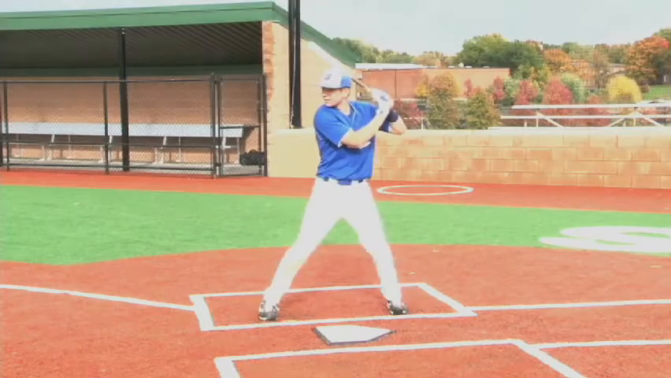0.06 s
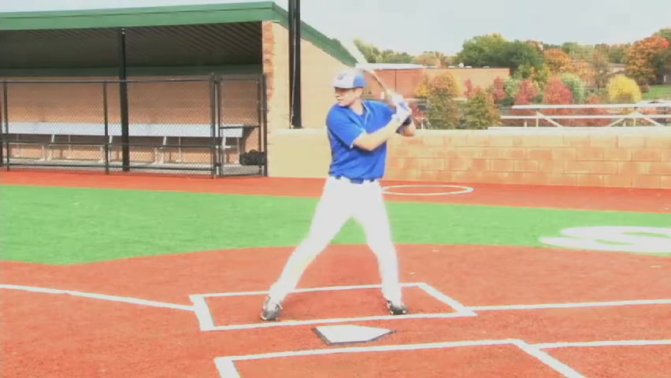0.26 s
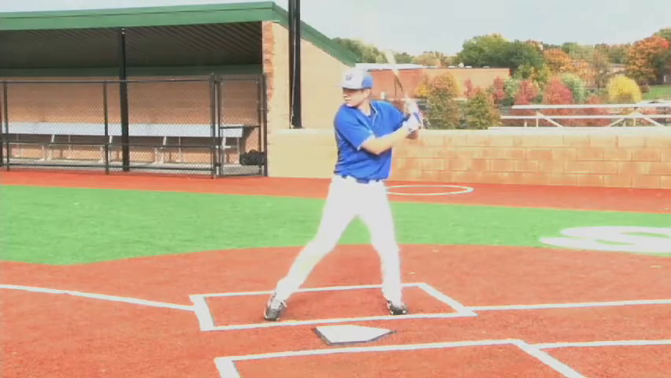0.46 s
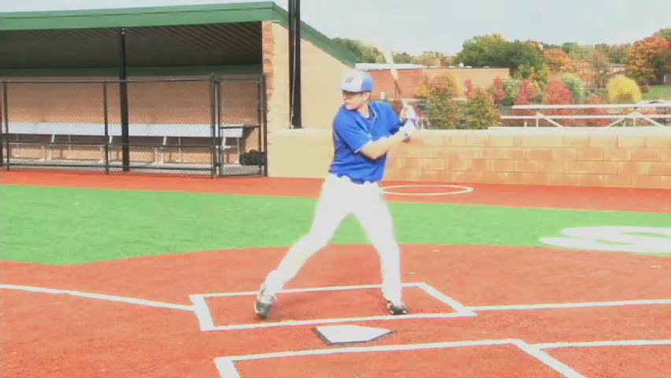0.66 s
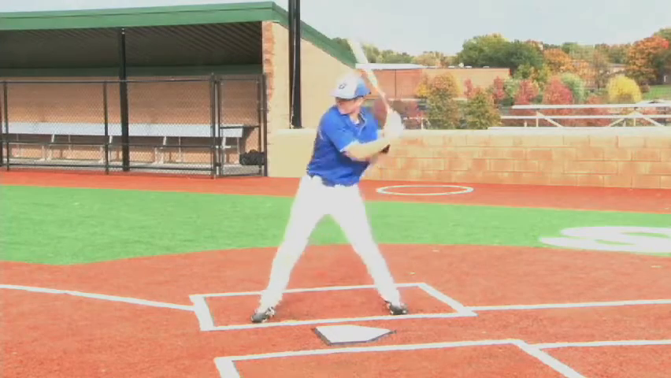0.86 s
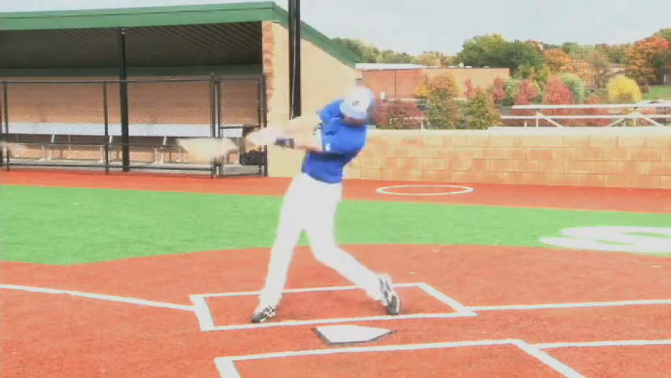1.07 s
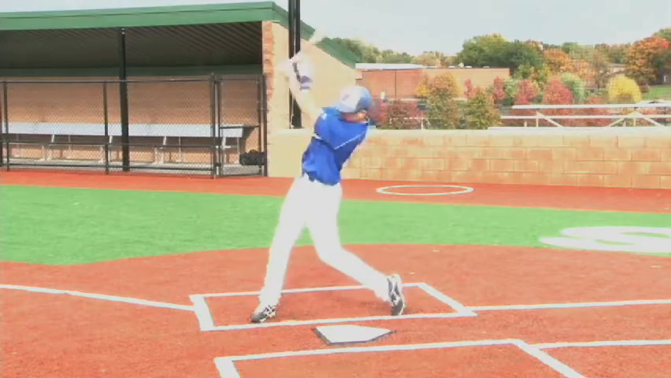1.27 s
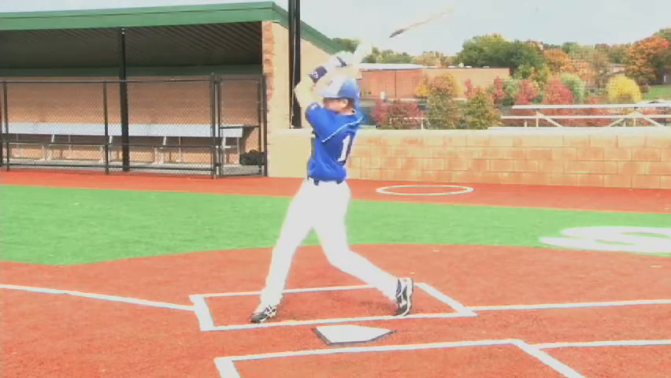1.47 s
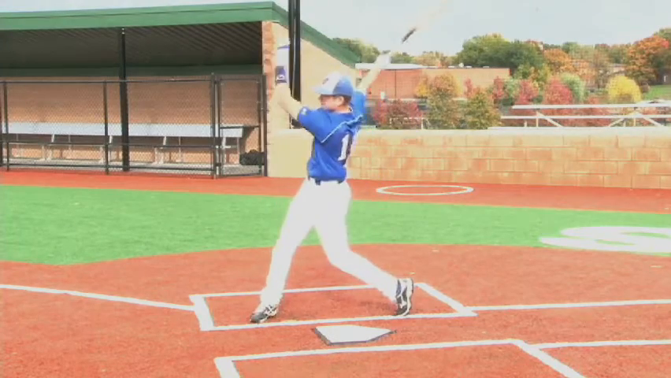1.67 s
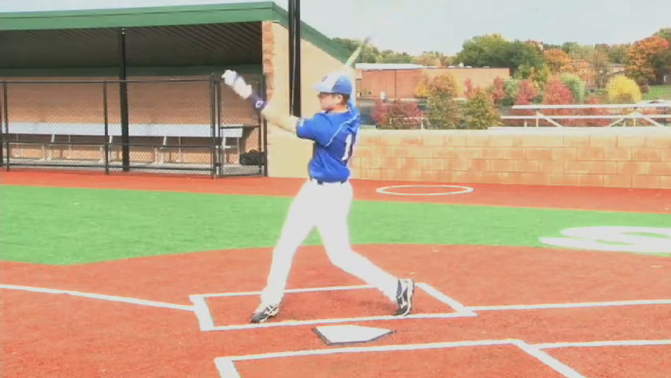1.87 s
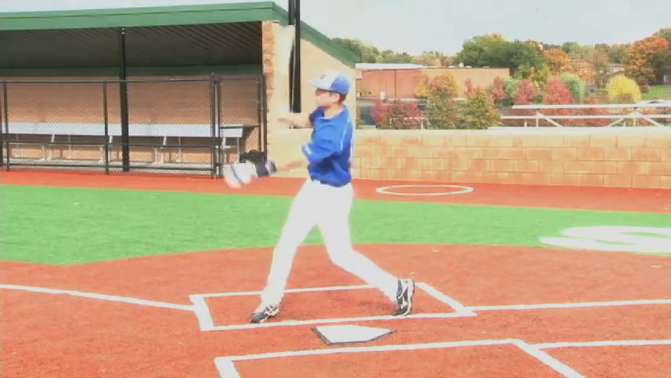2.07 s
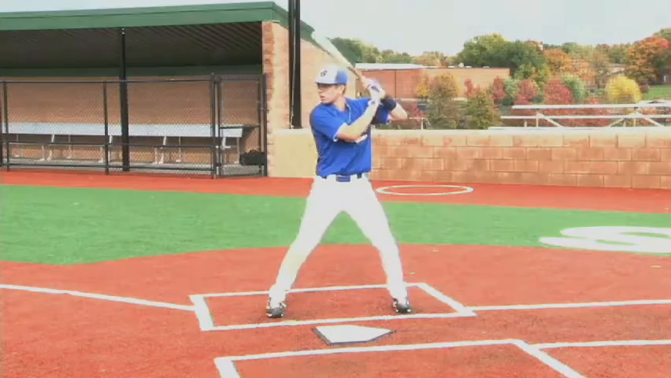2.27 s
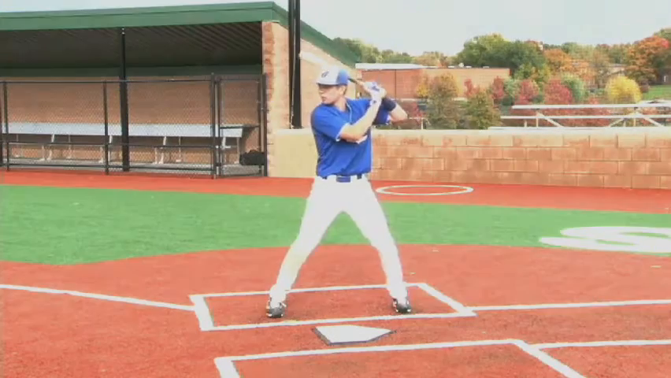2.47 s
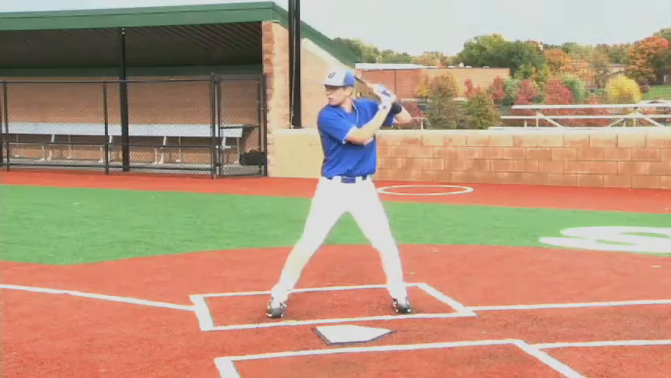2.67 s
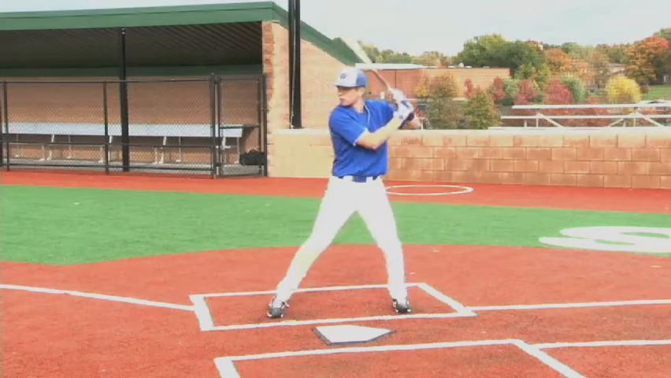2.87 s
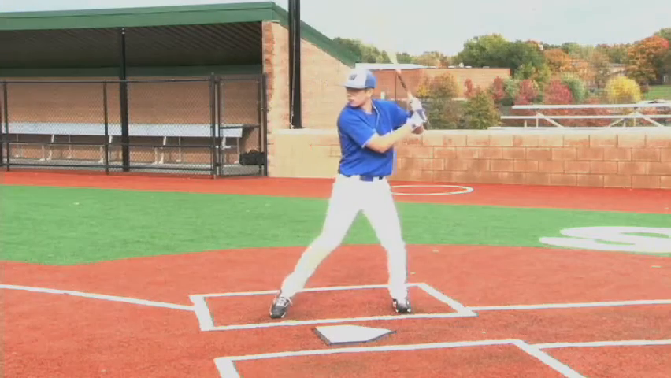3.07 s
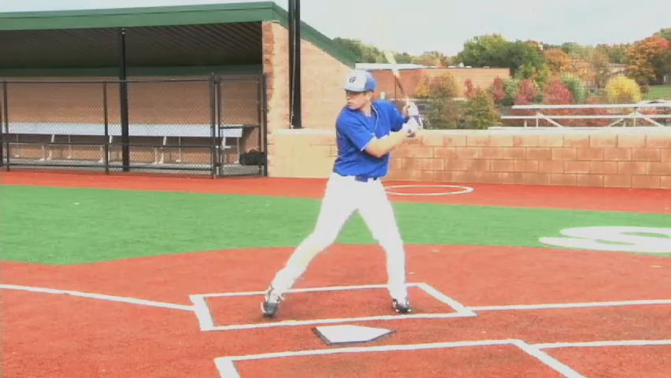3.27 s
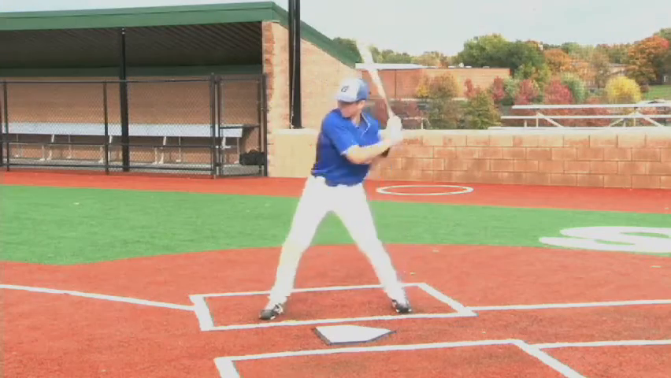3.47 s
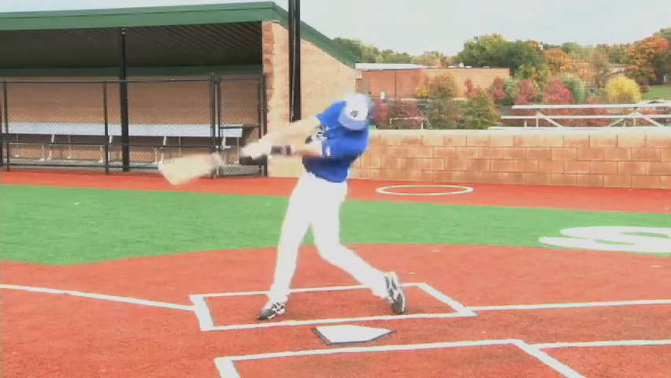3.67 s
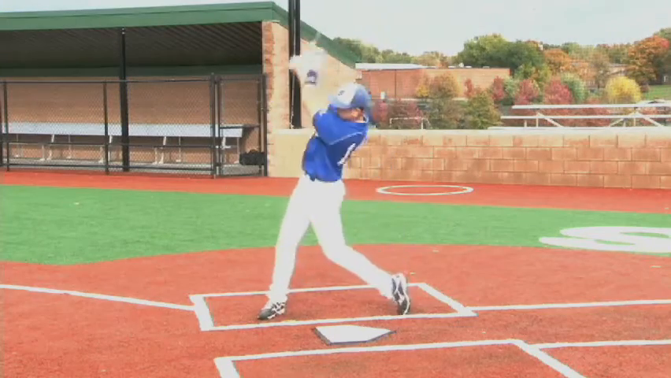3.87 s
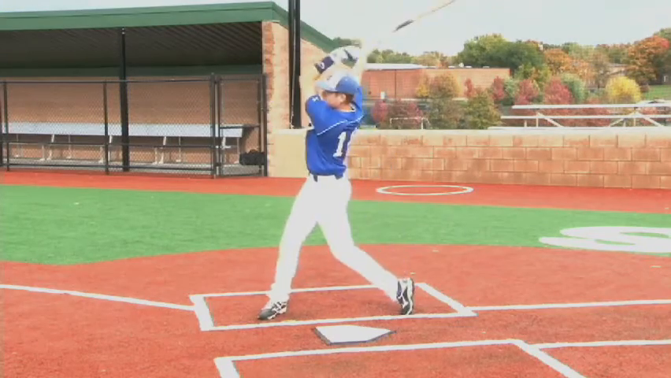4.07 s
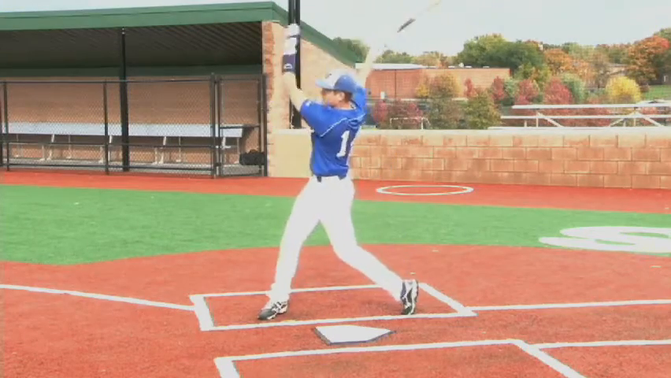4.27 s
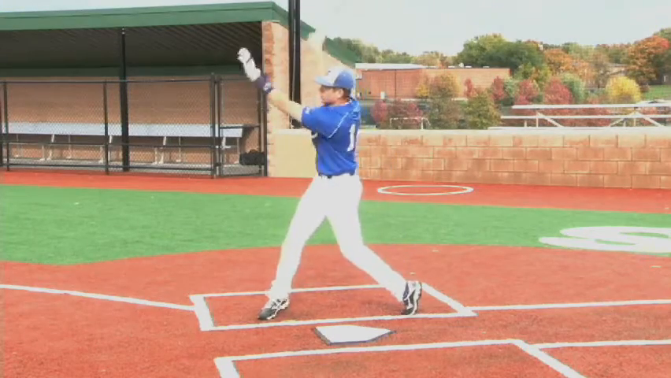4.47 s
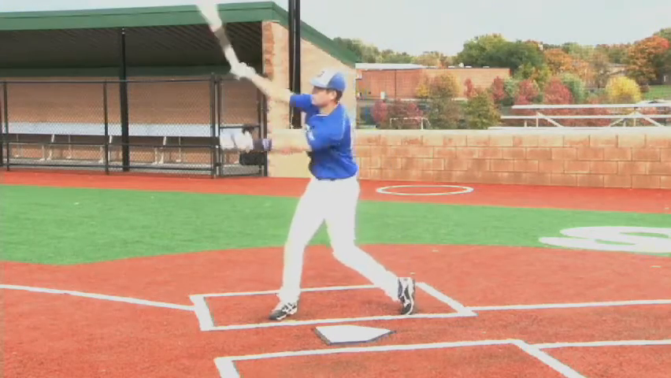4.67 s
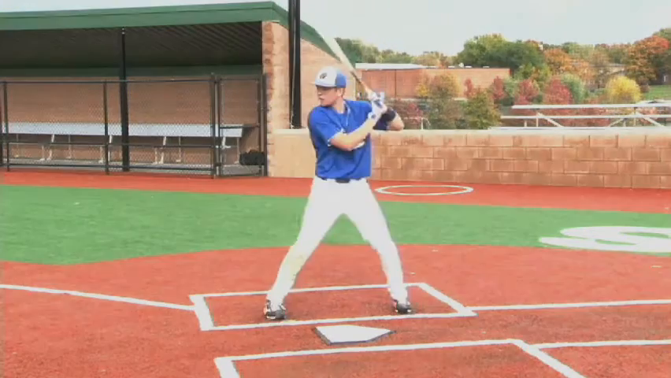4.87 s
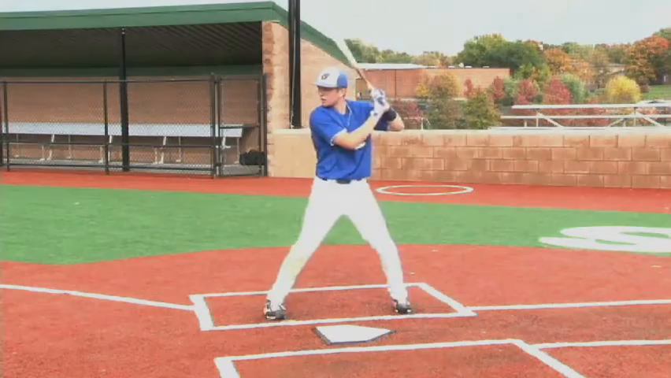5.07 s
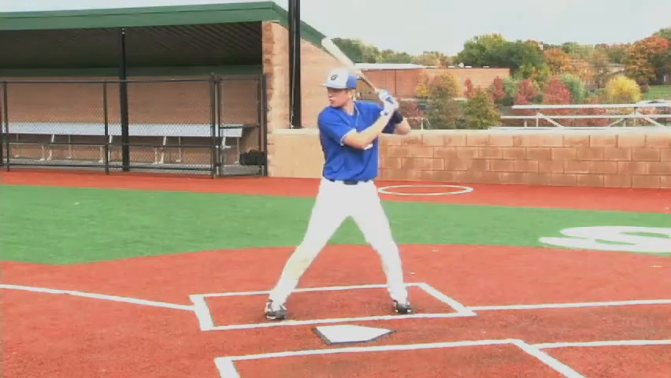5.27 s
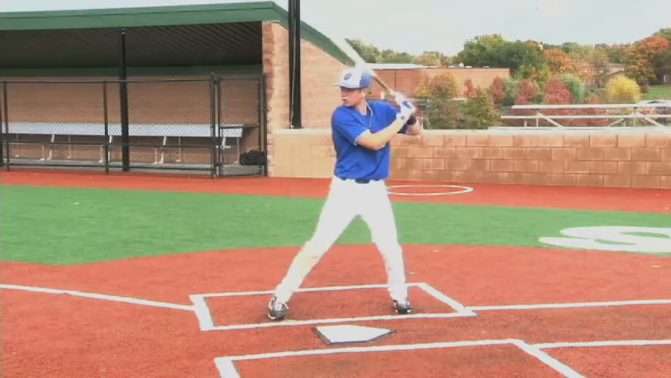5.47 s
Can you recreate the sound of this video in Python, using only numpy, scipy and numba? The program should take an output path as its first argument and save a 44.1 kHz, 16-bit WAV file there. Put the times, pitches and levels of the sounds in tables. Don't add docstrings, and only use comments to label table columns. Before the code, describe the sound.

An open baseball field heard from a camera microphone some metres away. From the start, low lumpy wind rumble and flapping press on the microphone, over soft hiss, distant traffic hum and faint leaves. Light cloth and shoe rustles come and go, with tiny squeaks and a faint chirp near 0.4 s. A slight airy rush rises just before 1.14 s, when a wooden bat cracks a ball: extremely short, hard, dry and loud, clipping slightly. Slap echoes from dugout and walls arrive from about 40 to 150 milliseconds later, then a diffuse wash dulls and fades within a second. The background is ducked, returning around 2.2 s with small chirps and shuffles. Wind swells near 3.1 s. At 3.74 s a second crack, a little brighter and harder, brings the same clattering echoes and tail. The background dips again, recovers near 4.9 s, and wind continues until the end at about 5.5 s.

```python
import sys
import numpy as np
from scipy import signal
from scipy.fft import rfft, irfft
from scipy.io import wavfile
from scipy.ndimage import uniform_filter1d
from numba import njit

SR = 44100
rng = np.random.default_rng(int(sys.argv[2]) if len(sys.argv) > 2 else 0)


def decibels_to_gain(level_db):
    exponent = np.asarray(level_db, float) / 20
    return 10 ** exponent


def dump(signal):
    limited = np.clip(np.atleast_2d(signal).T, -1, 1)
    pcm = np.round(limited * 32767).astype(np.int16)
    wavfile.write(sys.argv[1], SR, pcm)


N = 243111
T = np.arange(N) / SR

BLOW_TIMES = [
    1.1432,
    3.7399,
]
# (time [s], half length [s], leaves lift [dB], rustle lift [dB])
STIR_EVENTS = [(.094, .04, 0, 2), (.55, 0.043, 2.5, 6), (.69, 0.12, 6, 12.5), (.98, 0.11, 2, 11),
               (1.35, 0.18, 4, 8.5), (1.65, .04, -3, 9), (2.36, .04, 1, 7), (2.51, .05, 4.5, -13),
               (2.69, 0.065, 2, 8), (3.07, 0.091, 0, 8), (3.27, 0.1, 2.5, 11), (3.55, 0.086, 0, 8.5),
               (3.95, 0.14, 5.5, 8.5), (4.13, 0.046, 5.5, 10), (4.26, .03, -1, 4), (4.6, .04, -3, 6),
               (4.81, .04, 2.5, 6), (1.87, 0.092, -4, -3.5), (5.13, 0.085, 2.5, -2)]
# (frequency [Hz], level [dB])
AIR_TONE = [(6180, -30), (10500, -2), (14400, -0.5), (15200, -9.5), (15700, -23.5), (16000, -26.5)]


def noise():
    return rng.standard_normal(N)


def grit(spread_db):
    return noise() * decibels_to_gain(spread_db * np.minimum(rng.exponential(size=N), 4))


def colour(x, points):
    hz, db = np.transpose(points)
    log_hz = np.log(np.arange(N // 2 + 1) * SR / N + 1)
    response = decibels_to_gain(np.interp(log_hz, np.log(hz), db, left=-120, right=-120))
    y = irfft(rfft(x) * response, N)
    return y / y.std()


def walk(rate_hz):
    k = int(SR / rate_hz)
    held = np.repeat(rng.standard_normal(N // k + 1), k)
    return 1.7 * uniform_filter1d(uniform_filter1d(held, k), k)[:N]


def swells(rows):
    return sum(np.outer(lift, np.exp(-((T - s) / half) ** 2)) for s, half, *lift in rows)


def add(out, s, x):
    i = int(s * SR)
    out[i:i + len(x)] += x


def wavelet(t, hz, cycles):
    return -np.cos(2 * np.pi * hz * t) * np.exp(-(2 * t * hz / cycles) ** 2)


@njit
def svf(x, hz, q):
    y, b, l = np.empty(len(x)), 0., 0.
    for i in range(len(x)):
        g = np.tan(np.pi * hz[i] / SR)
        v = (b + g * (x[i] - l)) / (1 + g * (g + 1 / q))
        b, l, y[i] = 2 * v - b, l + 2 * g * v, v / q
    return y


@njit
def gain_control(x, top, attack_s, release_s):
    y, e = np.empty(len(x)), 0.
    for i in range(len(x)):
        a = abs(x[i])
        e += (a - e) / (SR * (attack_s if a > e else release_s))
        y[i] = x[i] * min(1., top / (e + 1e-9))
    return y


def stepped_gain(column):
    # (time [s], hiss [dB], traffic [dB], breeze [dB])
    stretches = [
        (0, -64, -57, -0.5),
        (1.149, -70, -62, -4.5),
        (2.222, -63.5, -60.5, 1.5),
        (3.747, -69, -67, -3.5),
        (4.93, -64.5, -58, 2),
    ]
    columns = np.transpose(stretches)
    current = np.searchsorted(columns[0], T, "right").clip(1) - 1
    return uniform_filter1d(columns[column][current], int(0.02 * SR))


def with_swing(level_db, column):
    # (lead [s], traffic [dB], leaves [dB], rustle [dB])
    rushes = [
        (.08, -54, -64, -66),
        (0.102, -56.5, -62.5, -64.5),
    ]
    gain = decibels_to_gain(level_db)
    for hit, row in zip(BLOW_TIMES, rushes):
        rise = np.clip((T - hit + row[0]) / 0.05, 0, 1) * (T < hit)
        gain = np.hypot(gain, decibels_to_gain(row[column]) * rise)
    return gain


def wind():
    # (time [s], level [dB])
    push = [(0, -45.5), (.42, -43.5), (.8, -41), (1.12, -37), (1.25, -41.5), (1.55, -47.5), (2.1, -48),
            (2.6, -48), (2.9, -45), (3.13, -36.5), (3.5, -46.5), (3.72, -38.5), (3.82, -49), (3.95, -46),
            (4.4, -47), (4.85, -41.5), (5.02, -48), (5.51, -43.5)]
    # (time [s], half length [s], rumble lift [dB], flap lift [dB])
    eddies = [(.036, 0.025, 9, 6.5), (.25, 0.066, 9, 9), (.404, 0.043, -5.5, -0.5), (.548, 0.017, 9, 6.5),
              (.644, 0.028, 7.5, 1), (.76, 0.046, 0, -1), (.836, 0.043, 7.5, 0), (1.13, 0.037, 2.5, 11),
              (1.45, 0.04, 1, 6.5), (1.75, 0.084, 0, 11.5), (1.89, .04, 1, 4), (1.96, 0.036, 1, 9),
              (2.0, 0.025, 3, -2), (2.21, 0.017, -7, 2), (2.27, 0.073, 3.5, -2), (2.35, 0.017, 3, 2.5),
              (2.72, 0.033, 6.5, 1), (2.8, 0.023, -7, -3), (2.98, 0.021, 10, 11), (3.57, .03, 8.5, -3.5),
              (3.69, 0.052, 3, -2.5), (3.846, 0.028, -9.5, -1.5), (3.886, .02, 4.5, -7),
              (4.24, 0.029, 2, 1), (4.36, .04, 9.5, 5.5), (4.434, .025, -4, -1), (4.544, .03, -5, 2),
              (4.73, .04, 1, -4), (4.89, .025, 5, 2), (4.96, 0.044, -7, -2.5), (5.38, 0.035, -1.5, 1)]
    # (frequency [Hz], level [dB])
    rumble_tone = [(8.8, -39), (15, -5), (32, -1.5), (50, 0), (99, -2), (160, -14), (210, -41), (350, -120)]
    # (frequency [Hz], level [dB])
    flap_tone = [(76, -35), (130, -1.5), (177, -3.5), (269, -10.5), (306, -12), (500, -22.5), (650, -52.5),
                 (1100, -120)]
    push_db = np.interp(T, *np.transpose(push))
    rumble_db, flap_db = swells(eddies)
    lumps = walk(25)
    rumble = colour(noise(), rumble_tone) * decibels_to_gain(rumble_db + lumps)
    flap_db = flap_db - 6.5 + 0.68 * lumps + 1.5 * walk(40)
    flap = colour(noise(), flap_tone) * decibels_to_gain(flap_db)
    return decibels_to_gain(push_db) * (rumble + flap)


def traffic():
    # (frequency [Hz], level [dB])
    traffic_tone = [(240, -23.5), (400, -8), (490, -14), (577, -8.5), (770, -10.5), (1390, -16),
                    (1620, -15.5), (4000, -35.5), (5200, -62.5), (8800, -120)]
    # (time [s], half length [s], lift [dB])
    carries = [(.65, 0.12, 0), (1.76, 0.097, 1.5), (2.3, .1, -0.5), (4.8, 0.11, 4), (5.14, 0.075, 2)]
    gain = with_swing(stepped_gain(2) + swells(carries)[0], 1)
    return colour(noise(), traffic_tone) * gain * decibels_to_gain(0.44 * walk(12))


def leaves():
    # (frequency [Hz], level [dB])
    leaf_tone = [(1470, -29.5), (2500, -1), (3490, 0.5), (4780, -5), (6000, -9), (7800, -37.5),
                 (13200, -120)]
    still_db = -74.5
    gain = with_swing(still_db + swells(STIR_EVENTS)[0] + stepped_gain(3), 2)
    return colour(noise(), leaf_tone) * gain * decibels_to_gain(0.8 * walk(6.7))


def rustle():
    # (frequency [Hz], level [dB])
    rustle_tone = [(2940, -28.5), (5000, -4), (5500, -4), (7290, -1), (8470, -6), (10800, -14.5),
                   (12000, -17), (15600, -44.5), (22000, -120)]
    still_db = -85
    gain = with_swing(still_db + swells(STIR_EVENTS)[1] + stepped_gain(3), 3)
    grains = colour(grit(2.3), rustle_tone) + decibels_to_gain(-14.5) * colour(noise(), AIR_TONE)
    return grains * gain * decibels_to_gain(2.0 + 0.64 * walk(21))


def hiss():
    # (frequency [Hz], level [dB])
    hiss_tone = [(260, -30), (450, -2), (547, -2), (774, -6), (1060, -6.5), (1250, -7.5), (1750, -11.5),
                 (2550, -16), (2790, -18.5), (7200, -25.5), (10800, -33), (13400, -37.5), (16500, -54.5)]
    floor = colour(noise(), hiss_tone) + decibels_to_gain(-26.5) * colour(noise(), AIR_TONE)
    return floor * decibels_to_gain(stepped_gain(1))


def squeaks():
    # (time [s], length [s], start [Hz], end [Hz], level [dB])
    chirps = [(0.067, .08, 6240, 5750, -70), (0.064, .05, 4700, 4800, -71), (.166, .04, 5500, 5200, -72),
              (.42, 0.21, 1400, 1680, -59.5), (.53, .07, 6200, 6300, -73), (.625, .066, 5630, 5200, -72),
              (0.953, 0.15, 3420, 3580, -67.5), (1.067, 0.021, 4200, 4200, -68),
              (1.599, 0.18, 1500, 1490, -63.5), (2.224, 0.12, 1460, 1600, -59),
              (2.341, 0.064, 1700, 1700, -60.5), (2.308, .076, 6700, 6700, -73),
              (2.459, 0.1, 7600, 6950, -71), (2.5, .05, 6200, 5700, -72), (2.67, .043, 4800, 4400, -68),
              (2.68, .051, 7300, 5760, -70), (2.74, 0.083, 1740, 1770, -67), (3.22, .09, 7300, 7400, -77),
              (3.44, 0.017, 6200, 6200, -70), (3.532, .025, 9600, 9500, -72), (4.81, .035, 4800, 4790, -70)]
    out = np.zeros(N)
    for s, length, start_hz, end_hz, db in chirps:
        u = np.linspace(0, 1, int(length * SR))
        hz = start_hz + (end_hz - start_hz) * u
        q = start_hz / (210 + 0.083 * start_hz)
        x = rng.standard_normal(len(u))
        x = svf(svf(x, hz, q), hz, q)
        swell = np.sqrt(np.sin(np.pi * u).clip(0))
        add(out, s, decibels_to_gain(db - 2.5) * swell * x / x.std())
    return out


def bat():
    # (frequency [Hz], t60 [s], level [dB])
    bat_modes = [
        [(418, 0.004, -14), (677, 0.0064, 0.5), (1400, .016, -6.5), (2230, 0.009, -10), (3685, .008, 1.5),
         (4187, 0.009, -1), (5250, 0.0048, -3), (6320, 0.0063, -2), (7470, 0.0054, -10.5)],
        [(150, .016, -20), (830, 0.0069, 5), (1490, 0.012, -2), (1740, 0.0078, -9), (2770, 0.0093, -4.5),
         (3537, 0.0056, 9.5), (4390, 0.01, 2), (5480, 0.005, 1.5), (6200, 0.008, -2), (7930, 0.0044, 1.5)],
    ]
    # (delay [s], level [dB])
    rattles = [
        [(.0022, -11), (.007, -9), (.0125, -28.5), (.028, -40.5)],
        [(.0015, -5.5), (.0065, -11), (.0125, -30), (.018, -44), (.023, -44.5)],
    ]
    # (frequency [Hz], level [dB])
    rattle_tones = [
        [(240, -42.5), (400, -25.5), (1290, 3.5), (2930, -13.5), (3640, -11.5), (6340, -21.5), (7170, -23),
         (11000, -26), (16000, -44.5)],
        [(240, -42.5), (400, -11), (777, 1), (3690, -2.5), (4880, -10.5), (6050, -5.5), (6640, -22),
         (9040, -12.5), (16000, -44.5)],
    ]
    out, t = np.zeros(N), T[:1500]
    for s, modes, rebounds, tone in zip(BLOW_TIMES, bat_modes, rattles, rattle_tones):
        ring = 0
        for hz, t60, db in modes:
            push = np.sign(2000 - hz)
            decay = decibels_to_gain(db - 60 * t / min(t60, 0.016))
            ring = ring + push * decay * np.sin(2 * np.pi * hz * t)
        add(out, s, decibels_to_gain(6) * ring * (1 - np.exp(-t / 0.00008)))
        size = 0
        for late, db in rebounds:
            away_db = np.maximum(4000.5 * (late - t), 5499 * (t - late))
            size = size + decibels_to_gain(db - away_db)
        add(out, s, colour(grit(0.27), tone)[int(s * SR):][:len(t)] * size)
    return out


def slaps():
    arrivals = [
        [1.1808, 1.1833, 1.1887, 1.2000, 1.2077, 1.2551, 1.2610, 1.2917],
        [3.7775, 3.7815, 3.7849, 3.7965, 3.8033, 3.8516, 3.8575, 3.8873],
    ]
    # (peak [dB], bright edge [dB])
    strengths = [
        [(-16.5, -11.5), (-25.5, -20), (-11, -12), (-27.5, 0), (-12.5, -29), (-21, -6.5), (-36, -22),
         (-19.5, 0.5)],
        [(-20.5, -5.5), (-22, -21), (-11, -11), (-42, -5), (-21, -2), (-22.5, -9), (-34, -20), (-24, 2.5)],
    ]
    # (centre [Hz], length [cycles], bright edge centre [Hz], tick [dB])
    walls = [(1900, 1.8, 5700, -16), (1600, 2.4, 1900, -39.5), (2170, 1.3, 2800, -30),
             (1770, 0.91, 2000, -25), (1700, 1.86, 3300, -47), (1530, 0.89, 3900, -35),
             (1500, 1.2, 7900, -30), (1500, 0.67, 4730, -6.5)]
    # (delay [s], level [dB])
    posts = [(.0485, -45), (.058, -52), (0.062, -56), (0.067, -57), (.076, -50), (.079, -50), (.086, -54),
             (0.096, -61), (.101, -46), (.118, -52), (.128, -54), (.132, -52), (.139, -45)]
    trail_db, trail_s, grain_s = -8, 0.002, 0.0023
    lead = T[200]
    out, t = np.zeros(N), T[:1000] - lead
    tick = wavelet(t + 0.0003, 10500, 1.8)
    for times, levels in zip(arrivals, strengths):
        for s, (db, edge_db), (hz, cycles, edge_hz, tick_db) in zip(times, levels, walls):
            edge = decibels_to_gain(edge_db) * wavelet(t + 0.00036, edge_hz, 2.3) + decibels_to_gain(tick_db) * tick
            chance = rng.standard_normal(len(t))
            centre = hz + 0 * t
            trail = svf(svf(chance, centre, 1.0), centre, 1.0)
            trail = decibels_to_gain(trail_db) * 2 * trail * np.exp(-t / trail_s) * (t > 0)
            grains = svf(chance[::-1].copy(), 1.15 * edge_hz + 0 * t, 1.2)
            grains = decibels_to_gain(trail_db - 7) * grains * np.exp(-t / grain_s) * (t > 0)
            add(out, s - lead, decibels_to_gain(db) * (wavelet(t, hz, cycles) + edge + trail + grains))
    for hit in BLOW_TIMES:
        for delay, db in posts:
            add(out, hit + delay - lead, decibels_to_gain(db) * tick)
    out = signal.sosfilt(signal.butter(4, 13500, fs=SR, output="sos"), out)
    return signal.sosfilt(signal.butter(2, 850, "high", fs=SR, output="sos"), out)


def scatter():
    # (delay [s], rise [s], level [dB], t60 [s])
    groups = [
        (.038, .006, -39.5, 0.34),
        (0.099, 0.016, -46.5, 0.62),
        (.17, 0.065, -61.5, 0.89),
    ]
    # (frequency [Hz], level [dB])
    scatter_tone = [(350, -42), (600, -17), (1660, 4), (1830, 2.5), (2540, -2), (4340, -2.5), (10500, -19),
                    (14500, -35.5), (16000, -57)]
    blow_levels = [
        0,
        -0.5,
    ]
    wash = colour(grit(2.0), scatter_tone) * decibels_to_gain(1.5 * walk(150))
    dull = signal.lfilter(*signal.butter(1, 5000, fs=SR), wash)
    out = 0
    for hit, blow_db in zip(BLOW_TIMES, blow_levels):
        t = np.clip(T - hit, 0, 1)
        size = 0
        for late, rise, db, t60 in groups:
            onset = np.clip((t - late) / rise, 0, 1)
            size = size + onset * decibels_to_gain(db - 60 * (t - late - rise).clip(0) / t60)
        size = size * decibels_to_gain(blow_db - 60 * t ** 2)
        dulling = np.clip(t / 0.9, 0, 1)
        out = out + size * (wash + dulling * (dull - wash))
    return out


def scene():
    background = wind() + traffic() + leaves() + rustle() + hiss() + squeaks()
    return (background + bat() + slaps() + scatter())[None]


def top_cut(x):
    return signal.sosfilt(signal.butter(12, 17130, fs=SR, output="sos"), x)


def record(dry):
    x = gain_control(dry[0], 0.15, 0.003, 0.029)
    x = np.clip(x, -0.46, 0.48)
    x = signal.lfilter(*signal.butter(1, 14000, fs=SR), x)
    x = signal.sosfilt(signal.butter(10, 16250, fs=SR, output="sos"), x)
    x = x * np.clip((T[-1] - T) / 0.004, 0, 1)
    return top_cut(x[None])


dry = scene()
out = record(dry)
dump(out)
```